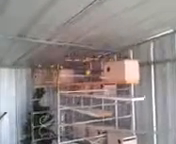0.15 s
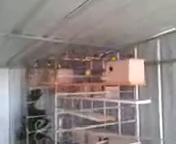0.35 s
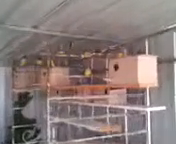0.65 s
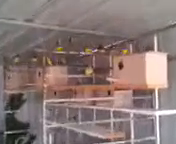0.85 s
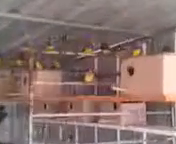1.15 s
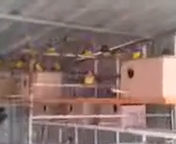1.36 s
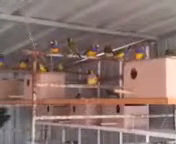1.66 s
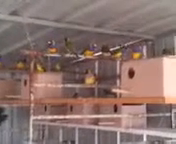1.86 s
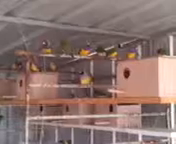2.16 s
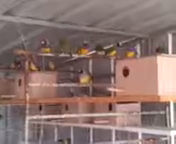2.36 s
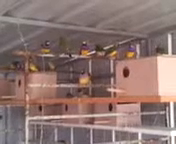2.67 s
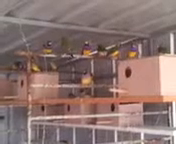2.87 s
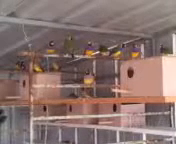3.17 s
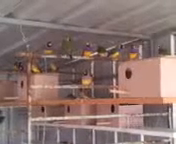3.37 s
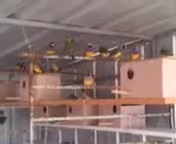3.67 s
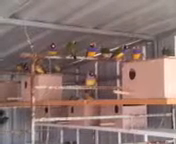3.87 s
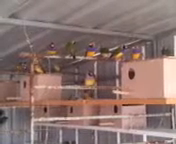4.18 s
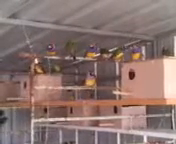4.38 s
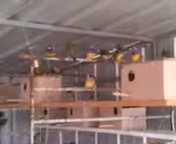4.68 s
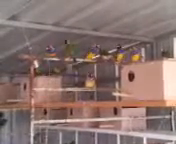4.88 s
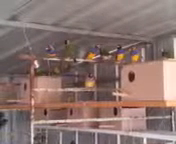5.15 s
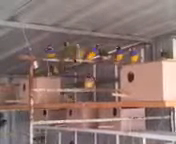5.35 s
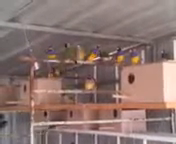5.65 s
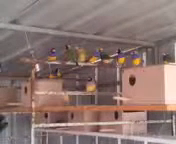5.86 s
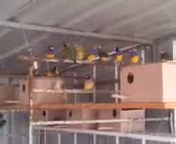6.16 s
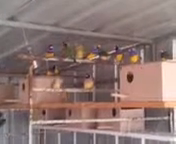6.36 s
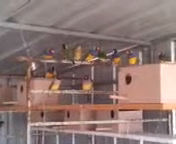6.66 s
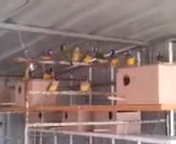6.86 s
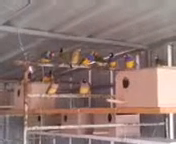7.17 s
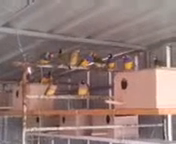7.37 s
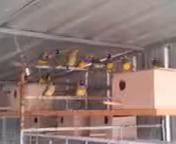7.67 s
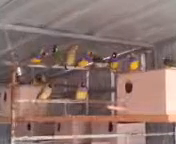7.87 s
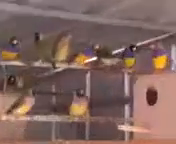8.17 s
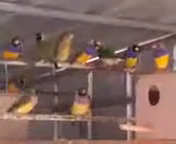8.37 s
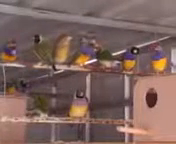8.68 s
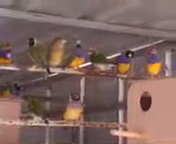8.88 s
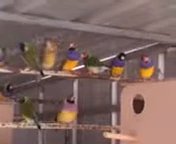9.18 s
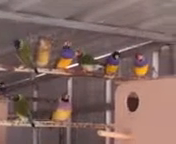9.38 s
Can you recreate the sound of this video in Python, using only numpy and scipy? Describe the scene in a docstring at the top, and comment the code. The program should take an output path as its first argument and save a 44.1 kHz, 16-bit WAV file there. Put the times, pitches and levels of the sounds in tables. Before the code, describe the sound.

A close finch sings a short phrase twice while a flock calls and flutters further off in a humming indoor aviary.

```python
"""Finches in a sheet-metal aviary

One small finch sings its phrase twice close by. Others whistle, rasp and seep (a thin, high call) further off;
every call is a gliding tone, and the shed rings after it. Wings flap, feathers rustle, air handling hums and a
perch is knocked once. Only the right channel has a microphone, and the near song is loud enough there to clip;
the left carries just its own hiss."""
import sys
import numpy as np
from scipy import signal
from scipy.fft import rfft, irfft, next_fast_len
from scipy.io import wavfile
from scipy.ndimage import uniform_filter1d, map_coordinates

SR = 44100
rng = np.random.default_rng(int(sys.argv[2]) if len(sys.argv) > 2 else 0)


def log_audio(samples):
    """Write samples as a 16-bit WAV file to the path given in sys.argv[1]."""
    # one column per channel
    frames = np.atleast_2d(samples).T
    # limit to full scale, then quantise
    limited = np.clip(frames, -1, 1)
    pcm = np.round(limited * 32767).astype(np.int16)
    wavfile.write(sys.argv[1], SR, pcm)


N = 420273


def amp(db):
    """Turn decibels (dB) into a number to multiply a sound by."""
    return 10 ** (np.asarray(db) / 20)


def unit(x):
    """Scale a signal so that its average power is 1."""
    return x / np.sqrt(np.mean(x ** 2) + 1e-20)


def along(points, hz):
    """Read between (Hz, value) points, giving each octave about equal room."""
    point_hz, values = np.transpose(points)
    return np.interp(np.log(hz + 1), np.log(point_hz + 1), values)


def over_time(rows):
    """Join rows of (seconds, values..) into one scene-long curve for each value column."""
    times, *columns = np.transpose(rows)
    return [np.interp(np.arange(N) / SR, times, column) for column in columns]


def wobble(rate, size=N):
    """A smooth curve through `rate` random values a second."""
    points = rng.standard_normal(int(size * rate / SR) + 4)
    return map_coordinates(points, [np.arange(size) * rate / SR])


def filtered(x, response):
    """Turn each frequency in x up or down by response(hz)."""
    size = next_fast_len(x.shape[-1] + 8192)
    hz = np.fft.rfftfreq(size, 1 / SR)
    return irfft(rfft(x, size) * response(hz), size)[..., :x.shape[-1]]


def noise(spectrum, size=N):
    """Noise of power 1, coloured by (Hz, dB) points."""
    return unit(filtered(rng.standard_normal(size), lambda hz: amp(along(spectrum, hz))))


def patchy_noise(spectrum, patchy_db):
    """Noise in which small patches of time and pitch are randomly louder or softer."""
    slices = signal.stft(noise(spectrum), nperseg=512)[2]
    patches = uniform_filter1d(rng.standard_normal(slices.shape), 8, axis=0)
    patches = unit(uniform_filter1d(patches, 6, axis=1))
    return unit(signal.istft(slices * amp(patchy_db * patches), nperseg=512)[1][:N])


def add_in_shed(track, start, sound, echo_db):
    """Add a sound with its own pattern of wall echoes and the ringing of the shed."""
    # Each row: frequency in Hz, seconds the ringing takes to fade by 60 dB.
    ring_times = [(300, 0.86), (1300, 0.66), (2500, 0.37), (4200, 0.3), (8000, 0.26), (14000, 0.35)]
    # The first echoes off the walls. Each row: delay in seconds, relative level in dB.
    wall_echoes = [(.0047, -10.5), (.0091, -6), (0.0144, -15), (0.022, -7.5), (0.028, -13.5), (.043, -9)]
    hz, t, slices = signal.stft(rng.standard_normal(SR // 2), SR, nperseg=256)
    fade = amp(-60 * t / along(ring_times, hz)[:, None])
    tail = signal.istft(slices * fade, SR, nperseg=256)[1]
    tail = np.r_[np.zeros(130), tail / np.linalg.norm(tail)]
    delays, db = np.transpose(wall_echoes)
    delays = delays * rng.uniform(.9, 1.1, len(delays))
    tail[(delays * SR).astype(int)] += amp(db - 6.5)
    room = amp(echo_db) * tail
    room[0] = 1  # the sound that arrives directly
    first = round(start * SR)
    heard = signal.fftconvolve(sound, room)[max(-first, 0):N - first]
    first = max(first, 0)
    track[first:first + len(heard)] += heard


def bird_tone(rows, octave_db, scatter, onset_s, strain=0):
    """A bird's voice box sings a tone and its octave along rows of (seconds, Hz, dB)."""
    times, hz, db = np.transpose(rows)
    t = np.arange(times[0], times[-1], 1 / SR)
    pitch = uniform_filter1d(np.interp(t, times, hz), 150)
    falling = np.clip(-np.gradient(np.log(pitch)) * SR / 6.1, 0, 1)
    waver = 0.00187 * wobble(91.4, len(t))
    # Fast pitch scatter sounds hoarse; strain adds more of it in quick falls.
    hoarseness = (scatter + strain * falling) * wobble(900, len(t))
    phase = 2 * np.pi * np.cumsum(pitch * (1 + waver + hoarseness)) / SR
    soft_ends = np.clip(np.minimum(t - times[0], times[-1] - t) / onset_s, 0, 1)
    level = amp(np.interp(t, times, db) - 6 + 2.2 * wobble(60.8, len(t)))
    # The throat passes little above its resonance at 5400 Hz.
    octave = amp(octave_db - 9 * np.clip(2 * pitch - 5400, 0, None) / 1000)
    return level * soft_ends * (np.sin(phase) + octave * np.sin(2 * phase))


def near_singer():
    """The near finch sings three notes and three chirps, then repeats them a touch slower."""
    # Each row: start in seconds, level change in dB, time stretch (above 1 is slower).
    repeats = [(-.064, -1.5, .988), (6.406, -0.5, 1.001)]
    # One list per note. Each row: seconds into the phrase, pitch in Hz, relative level in dB.
    opening_notes = [
        [(0, 7470, -18), (.008, 6300, 3.5), (.018, 4895, 6), (.03, 7170, -6.5), (.04, 5700, -8.5),
         (.052, 4870, 5), (.062, 4700, -21)],
        [(.13, 6250, -21), (.138, 7000, -9.5), (.15, 4800, -2.5), (.163, 3626, -4.5), (.178, 3016, -12),
         (.194, 3610, -5), (.2, 3904, 6), (.22, 4400, 1), (.245, 4400, -31)],
        [(.264, 5346, -14), (.275, 6030, 9), (.292, 6874, 1), (.308, 6895, 3), (.33, 5844, 7.5),
         (.358, 4935, 3.5), (.385, 4400, -6), (.42, 4210, -20), (.432, 3100, -14.5), (.44, 3092, -21)],
    ]
    # Each row: seconds into the chirp, pitch in Hz, relative level in dB.
    chirp = [(0, 3703, 4), (.008, 4196, 2), (.017, 4850, -0.5), (.026, 4980, -0.5), (.038, 4382, 2.5),
             (.052, 3800, 0), (.075, 3234, -12.5)]
    # Each row: seconds into the phrase, level change in dB.
    chirp_starts = [(.447, 0.5), (.565, -0.14), (.695, -0.55)]
    phrase = opening_notes + [np.add(chirp, [start, 0, db]) for start, db in chirp_starts]
    track = np.zeros(N)
    for start, db, stretch in repeats:
        for note in phrase:
            rows = np.multiply(note, [stretch, 1, 1])
            tone = bird_tone(rows, octave_db=-40, scatter=0.0141, strain=0.01575, onset_s=0.0022)
            add_in_shed(track, start + rows[0, 0], amp(db + 3) * tone, echo_db=1.5)
    return track


def air_handling():
    """Moving air makes a low drone and a rushing draught."""
    # Each row: time in seconds, drone level in dB, draught level in dB.
    levels = [(0, -42.5, -39.5), (.66, -45, -44), (.82, -41.5, -43.5), (1.09, -45, -43), (1.462, -40, -42),
              (2.25, -42.5, -45), (2.6, -47, -43), (2.79, -40, -43), (3.34, -44.5, -43.5),
              (3.95, -36.5, -45), (4.48, -41, -42.5), (4.99, -49.5, -50.5), (5.25, -45, -48.5),
              (5.92, -53.5, -48), (6.13, -42.5, -44), (7.09, -49, -50), (9.05, -50, -45), (9.4, -38.5, -47)]
    # Each row of both: frequency in Hz, relative level in dB.
    drone_colour = [(12, -36), (20, -17), (76, -9.5), (118, 1), (167, -8.5), (180, -8), (230, -27),
                    (400, -120)]
    draught_colour = [(100, -27), (170, -2), (417, -4.5), (1020, -18), (1100, -15), (1430, -58),
                      (2420, -120)]
    drone_db, draught_db = over_time(levels)
    drone = amp(drone_db + 0.5 * wobble(2.9)) * noise(drone_colour)
    draught = amp(draught_db + 0.89 * wobble(7)) * noise(draught_colour)
    return drone + draught


def restless_flock():
    """Feathers rustle, swelling at small claw ticks, over the blurred murmur of the shed."""
    # Each row: time in seconds, base rustle level in dB, murmur level in dB.
    levels = [(0, -40, -38), (.21, -36, -36.5), (.56, -36.5, -48), (.93, -46, -44), (1.3, -42.5, -48),
              (2.02, -43, -40.5), (3, -41.5, -44.5), (3.66, -47.5, -48.5), (3.85, -47, -37),
              (3.98, -54, -50.5), (4.4, -43, -41), (5.25, -46.5, -49.5), (5.75, -41, -41), (6.1, -52, -53),
              (6.35, -37, -41.5), (7.1, -36.5, -43.5), (7.62, -45.5, -45), (8.4, -44.5, -44.5),
              (8.71, -51, -50), (9.42, -45, -46)]
    # Each row of both: frequency in Hz, relative level in dB.
    rustle_colour = [(1800, -41), (2800, -6), (3900, 0), (5200, -2.5), (6600, -1), (9500, -9), (14600, -19)]
    murmur_colour = [(400, -1.5), (700, -3.5), (1000, -4.5), (1500, -1.5), (2300, 1), (3300, -10.5),
                     (5000, -41)]
    rustle_db, murmur_db = over_time(levels)
    ticks = (rng.random(N) < 12 / SR) * rng.random(N)  # about 12 a second
    tick_fade = amp(-60 * np.arange(6000) / SR / 0.21)
    swells = signal.fftconvolve(ticks, tick_fade)[:N]
    rustle = amp(rustle_db) * (1 + 1.05 * swells) * patchy_noise(rustle_colour, patchy_db=3.5)
    murmur = amp(murmur_db + 0.43 * wobble(3.8)) * patchy_noise(murmur_colour, patchy_db=3.5)
    return rustle + murmur


def wing_flaps():
    """Wings clap on perches and wire, each clap a short puff of feather noise."""
    # Each row: time in seconds, relative level in dB, relative treble in dB.
    claps = [(0.037, -22.5, -13), (0.768, -29.5, -14.5), (0.969, -60.5, 20.5), (1.361, -22.5, -11.5),
             (1.64, -70, 15), (1.765, -33, -14), (2.066, -68, 2), (2.29, -36, -14), (2.655, -62, 12),
             (3.799, -40, -2), (4.22, -65, 12), (4.302, -46.5, -2), (4.8, -56, 14), (5.007, -47, 6),
             (5.285, -65, 13.5), (5.496, -44, -14), (6.045, -42.5, -8.5), (6.289, -42.5, -0.5),
             (7.385, -54, 13), (8.499, -38, -27), (8.867, -40.5, -10), (9.4, -54, 9.5)]
    # Each row: frequency in Hz, relative level in dB.
    feather_colour = [(120, -36), (250, -9), (800, -10), (1600, -2.5), (5900, -16), (9400, -26),
                      (14500, -47)]
    track, t = np.zeros(N), np.arange(2000) / SR
    for start, db, treble_db in claps:
        # The treble change grows over the three octaves above 1500 Hz.
        colour = [(hz, level + (treble_db + 24) * np.clip(np.log2(hz / 1500) / 3, 0, 1))
                  for hz, level in feather_colour]
        puff = filtered(rng.standard_normal(len(t)), lambda hz: amp(along(colour, hz)))
        add_in_shed(track, start - .003, amp(db + 10.5 - 60 * t / 0.064) * puff, echo_db=12)
    return track


def far_whistles():
    """Far finches slide and swell into a note, then glide on, usually fading."""
    # Each row: start, swell time and glide time in seconds; first, main and last pitch in Hz;
    # glide shape (above 1 settles early); relative level, fade and octave overtone in dB.
    calls = [ (.29, 0.042, 0.094, 2670, 2672, 2710, 1.15, -24, 7, -27),
             (1.488, 0.057, 0.11, 1984, 2641, 2692, 0.86, -28.5, 45, 9.5),
             (1.755, 0.014, 0.099, 2530, 2530, 2590, 0.97, -28.5, 6, 3),
             (1.805, .03, 0.047, 5280, 4996, 3855, 1.84, -12, 14, -33),
             (1.91, 0.038, .25, 2570, 2850, 3275, 1.4, -25, 16, -0.5),
             (2.21, 0.051, 0.37, 2283, 2745, 3140, 3.55, -29.5, 9.5, -21),
             (2.3, 0.047, .2, 1765, 1907, 2110, 2.2, -36.5, -1, -15),
             (2.471, 0.056, 0.043, 3510, 4290, 4720, 2, -17.5, 12, -31),
             (2.57, .012, 0.058, 2557, 2630, 2930, 0.93, -29.5, 22, -6),
             (2.58, 0.048, 0.18, 4610, 4006, 3865, 1.26, -18, 36, -31),
             (2.9, 0.063, 0.2, 2215, 2332, 3240, 2.73, -19.5, 14.5, 0),
             (3.61, .008, 0.027, 3320, 3350, 3350, 1.1, -38, 10, -30),
             (3.72, .015, 0.02, 3170, 4140, 3970, 1.1, -24.5, 23, -21),
             (3.76, 0.013, 0.022, 2150, 2746, 2820, 1.1, -18, 17, -5),
             (3.845, 0.089, 0.031, 4080, 5596, 5400, .7, -19, 17, -25),
             (3.841, 0.031, .22, 2200, 2254, 2540, 2.45, -26, 22, 9),
             (3.93, 0.021, 0.12, 3830, 3754, 3576, 2.36, -24.5, 25, -25),
             (4.171, .01, .03, 3340, 3310, 3340, 1.1, -40.5, 7, -24),
             (3.8, .03, 0.066, 2870, 3290, 3500, 1.6, -22, 8, -25),
             (4.295, 0.018, 0.19, 3040, 3627, 3696, 1.5, -17, 24.5, -31),
             (4.682, 0.0068, 0.014, 4000, 3960, 3900, 1.1, -29, 1.5, -25),
             (4.746, .008, 0.02, 3960, 3990, 3910, 1, -23.5, 1.5, -18),
             (4.79, 0.007, 0.015, 4300, 4244, 4300, 1.1, -20.5, 2.5, -13),
             (5.158, 0.0098, 0.024, 2270, 2917, 2930, 1.3, -37.5, 23, 18.5),
             (5.49, .03, .095, 1740, 2112, 2532, 2.5, -29, .3, 2),
             (5.6, .02, 0.11, 2526, 2524, 1950, .45, -28, 9, 0.5),
             (5.495, 0.033, .17, 3310, 3654, 3686, 1.1, -20, 17, -31),
             (6.242, .005, 0.014, 2620, 2640, 2540, 1, -19, 23, -16),
             (6.3, .05, 0.065, 4470, 4760, 4900, 1.3, -21, 9, -25),
             (6.33, 0.086, 0.17, 2267, 2606, 3110, 1.55, -23, 2.5, -12),
             (6.5, .03, 0.13, 1896, 1980, 2120, 1.7, -33, 9, 5),
             (7.199, 0.046, 0.21, 2590, 2852, 3068, 4, -26, 22, 3),
             (7.255, 0.022, 0.16, 5770, 5880, 5910, 2.2, -17, 32, -38),
             (7.53, 0.038, 0.025, 3480, 3320, 3240, 1.1, -15.5, 4, -30),
             (7.61, 0.069, 0.15, 3607, 3894, 3910, 1.3, -7, 42, -39),
             (7.63, .012, 0.098, 7500, 7580, 7800, .9, -34.5, 17, -30),
             (7.75, .022, .11, 5760, 5600, 4893, 1.5, -1.5, 10, 7),
             (7.93, 0.023, 0.059, 4790, 3926, 2964, 2.36, -9, 15, -37),
             (8.012, 0.013, 0.064, 4090, 4050, 2300, 1.3, -5.5, 26.5, -37),
             (8.17, 0.025, .04, 2736, 2700, 2640, 1.1, -27.5, 11, -4),
             (8.19, 0.021, 0.028, 4470, 5710, 5620, 1.1, -5, 4, -41),
             (8.224, 0.0081, 0.099, 5610, 4950, 2345, 2.02, -3, 31.5, -41),
             (8.39, 0.019, 0.026, 3420, 3200, 2320, 1.3, -17.5, 19, -17),
             (8.45, .02, 0.045, 2560, 2820, 2920, 1.2, -35, 15, -17),
             (8.646, 0.022, 0.052, 2870, 2942, 2960, 1.2, -21.5, 21, -19),
             (8.73, .04, 0.045, 4160, 4580, 4410, .8, -32.5, 11, -33),
             (8.845, 0.049, 0.056, 3670, 4030, 3910, 1.2, -30, 28, -25),
             (9.17, 0.075, 0.086, 2870, 3144, 3050, 0.95, -40.5, -2, -13),
             (9.369, 0.0061, 0.035, 2600, 2675, 2284, 1.2, -25.5, 21, -15),
             (9.42, 0.072, 0.039, 1700, 2140, 2230, 0.98, -30, 4, 12.5),
             (9.44, 0.0045, 0.1, 3620, 3610, 3880, 1.1, -20, 20, 5),
             (9.46, 0.0065, .064, 4670, 4630, 5440, 1.55, -14, 11, -22)]
    track = np.zeros(N)
    progress = np.linspace(0, 1, 13)
    for start, swell_s, glide_s, first_hz, main_hz, last_hz, shape, db, fade_db, octave_db in calls:
        times = swell_s + glide_s * progress
        pitches = main_hz + (last_hz - main_hz) * (1 - (1 - progress) ** shape)
        levels = db - fade_db * progress ** 1.12
        rows = [(0, first_hz, db - 6), *zip(times, pitches, levels)]
        tone = bird_tone(rows, octave_db, scatter=0.012, strain=0.044, onset_s=0.007)
        add_in_shed(track, start, tone, echo_db=5.5)
    return track


def far_seeps():
    """Thin, high calls: a held tone, a flick up and a fall back."""
    # Each row: start in seconds, held pitch in Hz, top of the flick in Hz, relative level in dB.
    calls = [(0.814, 7160, 7670, -28.5), (1.029, 7360, 7800, -19.5), (4.483, 7160, 7830, -23),
             (4.611, 7346, 8000, -17), (4.789, 8540, 8650, -40), (5.526, 7120, 7580, -21.5),
             (5.719, 7390, 7980, -17), (7.262, 7020, 7700, -22.5), (7.42, 7453, 8170, -18),
             (9.092, 7070, 7580, -23.5)]
    track = np.zeros(N)
    for start, held_hz, top_hz, db in calls:
        rows = [(0, held_hz, db + 6), (.012, held_hz, db), (.026, held_hz, db + 4.5),
                (.036, top_hz, db - .7), (.062, held_hz, db - 2.5), (.08, held_hz, db - 17)]
        tone = bird_tone(rows, octave_db=-29, scatter=0.0063, onset_s=0.0057)
        add_in_shed(track, start, tone, echo_db=4.5)
    return track


def far_rasps():
    """Hoarse calls: the pitch shakes so fast and far that the tone turns scratchy."""
    # Each row: start and end in seconds, first and last pitch in Hz,
    # scatter as a share of the pitch, relative level in dB.
    calls = [(1.031, 1.095, 5240, 5040, .1, -34), (1.81, 1.883, 7400, 5960, 0.083, -31),
             (1.938, 2.098, 4080, 4220, 0.078, -24.5), (1.955, 2.118, 5460, 5590, 0.16, -29.5),
             (2.431, 2.522, 4630, 5180, 0.084, -25.5), (2.928, 3.063, 3440, 3940, 0.15, -34),
             (3.048, 3.328, 3566, 4110, 0.086, -30.5), (3.061, 3.228, 5690, 5130, 0.14, -32.5),
             (3.758, 3.867, 5290, 5030, 0.12, -26.5), (3.818, 3.988, 6260, 6470, 0.34, -29.5),
             (5.701, 5.884, 4870, 5460, 0.071, -26.5), (5.89, 5.987, 5130, 3780, 0.062, -39.5),
             (6.14, 6.205, 5040, 4940, 0.052, -38), (6.247, 6.297, 3466, 4030, 0.38, -27.5),
             (6.293, 6.404, 4490, 5280, 0.26, -21), (7.333, 7.444, 4840, 4510, .15, -27.5),
             (7.533, 7.7, 5570, 5600, 0.17, -29), (7.941, 8.084, 5620, 5670, 0.18, -25.5),
             (8.212, 8.306, 6720, 6470, 0.13, -28), (8.328, 8.541, 4805, 5580, .1, -25.5),
             (8.575, 8.651, 4040, 3980, 0.064, -38), (8.784, 8.914, 5100, 5540, 0.071, -37),
             (8.975, 9.043, 3980, 4300, 0.062, -43), (9.103, 9.19, 4970, 4860, .08, -39),
             (9.368, 9.46, 4970, 4420, 0.085, -23.5), (9.398, 9.537, 3510, 4570, 0.2, -25.5),
             (9.445, 9.487, 7000, 6240, .05, -22.5)]
    attack_s, fade_db = 0.0199, 6.5
    track = np.zeros(N)
    for start, end, hz, last_hz, scatter, db in calls:
        rows = [(start, hz, db), (start + attack_s, hz, db), (end, last_hz, db - fade_db)]
        tone = bird_tone(rows, octave_db=-19, scatter=scatter, onset_s=0.0052)
        add_in_shed(track, start, tone, echo_db=6.5)
    return track


def perch_knock():
    """A wooden perch gives one dull knock: a brief low tone with a click of noise."""
    # One row: start in seconds, pitch in Hz, level in dB, seconds to fade by 60 dB.
    knock = (8.468, 330, -24, .009)
    start, hz, db, fade_s = knock
    track, t = np.zeros(N), np.arange(2000) / SR
    tone = np.sin(2 * np.pi * hz * t)
    click = .6 * rng.standard_normal(len(t)) * amp(-60 * t / .006)
    add_in_shed(track, start, amp(db - 60 * t / fade_s) * (tone + click), echo_db=-9)
    return track


def scene():
    """All sound reaches the right channel; the left stays silent."""
    calls = near_singer() + far_whistles() + far_rasps() + far_seeps()
    right = calls + wing_flaps() + perch_knock() + restless_flock() + air_handling()
    return np.array([np.zeros(N), right])


def record(dry):
    """The highest treble is cut away, loud peaks are flattened, both channels hiss."""
    # Each row: frequency in Hz, relative level in dB.
    hiss_colour = [(30, 15), (200, 5.5), (1500, 0.5), (14300, 3.5), (14700, -120)]
    cutoff_hz, top_hz, ceiling = 14600, 15569, 0.9
    heard = filtered(dry, lambda hz: hz < cutoff_hz)
    # Tripling the sample rate during the overload keeps its overtones from folding back as false tones.
    fine = signal.resample_poly(heard, 3, 1, axis=1)
    clipped = fine / (1 + np.abs(fine / ceiling) ** 12) ** (1 / 12)
    overloaded = signal.resample_poly(clipped, 1, 3, axis=1)
    hiss = amp(-61.5) * np.array([noise(hiss_colour), noise(hiss_colour)])
    return filtered(overloaded + hiss, lambda hz: np.clip((top_hz - hz) / 500, 0, 1) ** 2)


dry = scene()
out = record(dry)
log_audio(out)
```